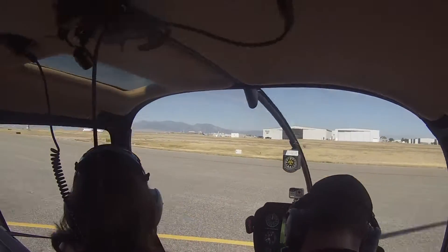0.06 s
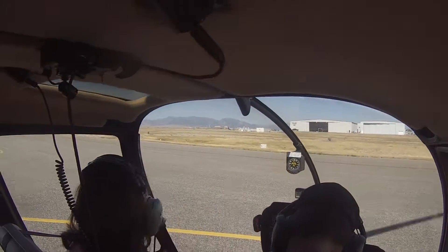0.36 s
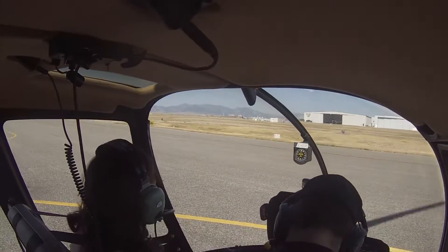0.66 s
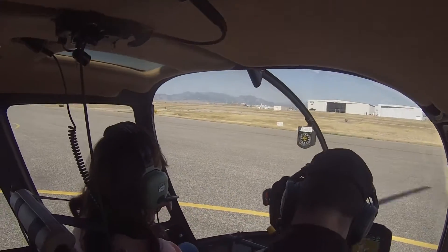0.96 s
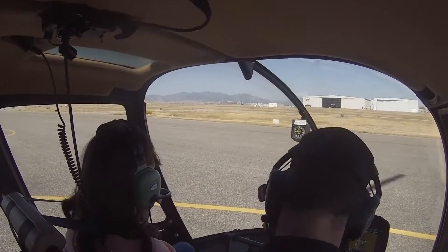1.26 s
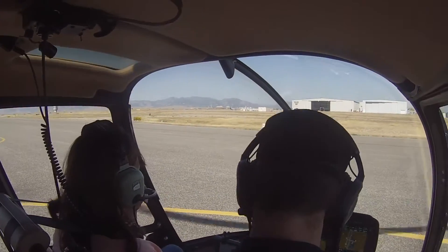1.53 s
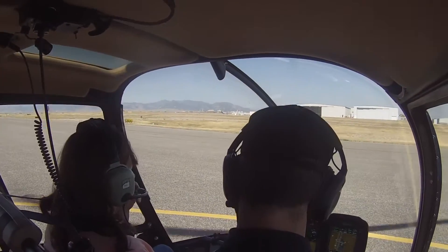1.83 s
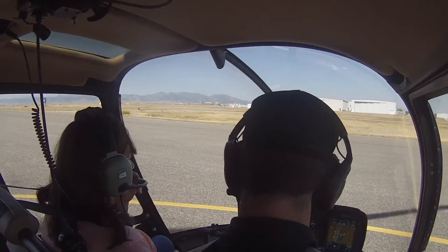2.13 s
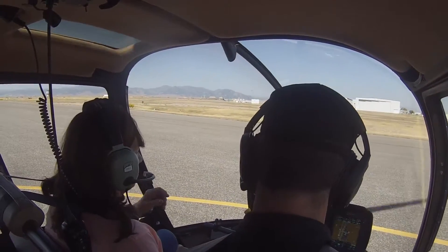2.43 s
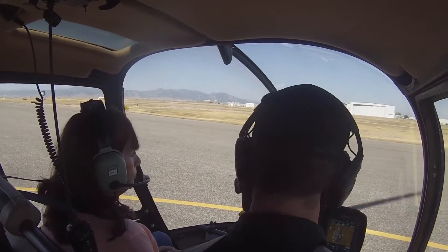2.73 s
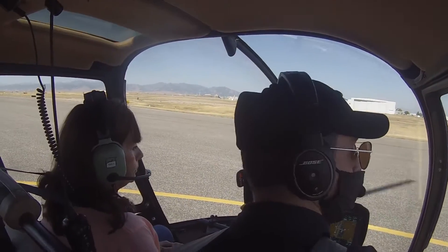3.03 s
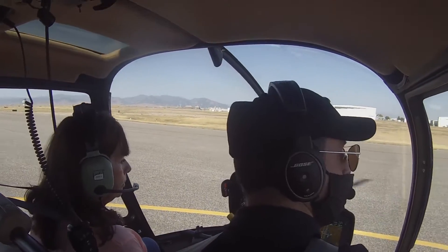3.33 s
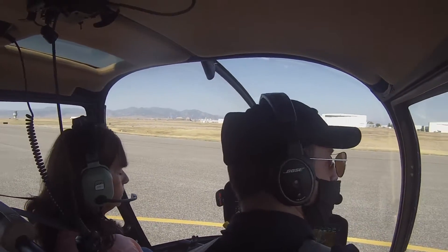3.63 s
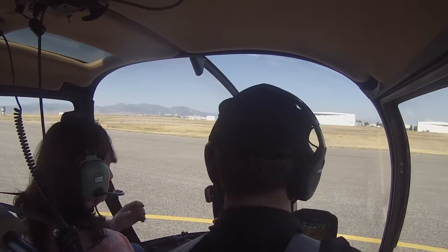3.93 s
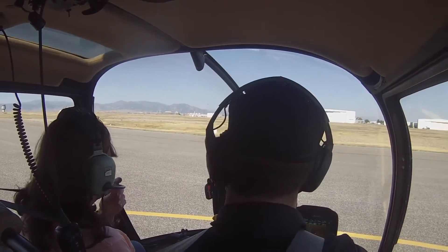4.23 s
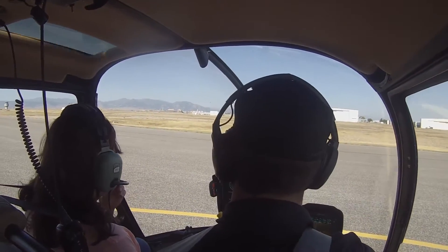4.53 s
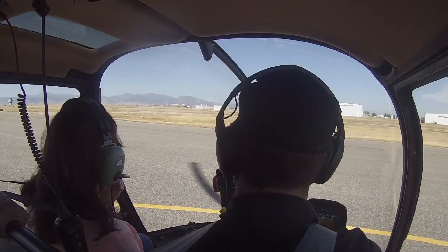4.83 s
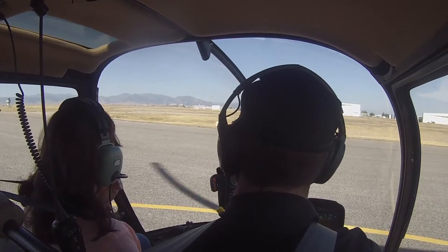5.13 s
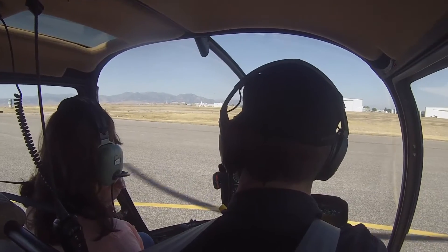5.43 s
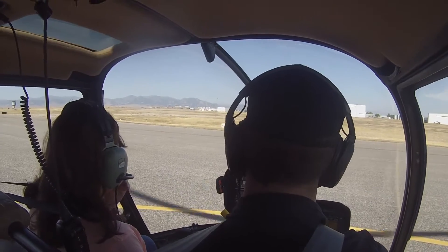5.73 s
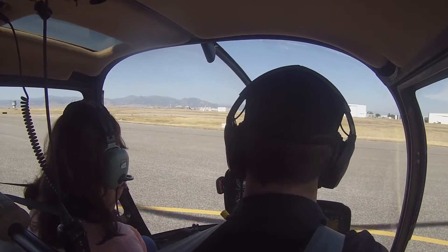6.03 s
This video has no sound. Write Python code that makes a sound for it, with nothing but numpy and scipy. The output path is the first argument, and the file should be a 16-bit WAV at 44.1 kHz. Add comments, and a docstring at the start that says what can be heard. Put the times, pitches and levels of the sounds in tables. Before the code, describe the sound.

Inside a small helicopter running on the ground, a deep, steady engine drone carries a fine mechanical clatter and soft rotor pulsing.

```python
"""Inside a small piston helicopter

On the ground at steady speed, microphone in the cabin, close to the canopy glass.
The six-cylinder engine booms at its firing rate; each firing also shakes the panels and sets the
valve gear clattering. The tail rotor hums, the gearbox whines, and the two main blades pat the
hiss as they pass overhead. Between one and three seconds in, the treble opens and a panel buzzes."""
import sys
import numpy as np
from scipy import signal
from scipy.fft import rfft, irfft, next_fast_len
from scipy.io import wavfile

SR = 44100
rng = np.random.default_rng(int(sys.argv[2]) if len(sys.argv) > 2 else 0)


def waveform_to_disk(signal):
    """Save audio, clipped to [-1, 1], as 16-bit WAV at the path in sys.argv[1]."""
    frames = np.transpose(np.atleast_2d(signal))
    scaled = np.clip(frames, -1, 1) * 32767
    samples = np.round(scaled).astype(np.int16)
    wavfile.write(sys.argv[1], SR, samples)


N = 272097
TIME = np.arange(N) / SR

# accents of the six cylinders in firing order: rasp/dB, clatter/dB, tick/dB
CYLINDERS = [(-4, 1.5, 2), (-2.5, -1, -1), (-3, -1.5, -3.5), (-1.3, 4, 3.5), (-3, -5, -2.5), (-1, 5, -7.5)]
RASP_ACCENTS, CLATTER_ACCENTS, TICK_ACCENTS = np.transpose(CYLINDERS)


def amp(db):
    """Decibels to gain."""
    return 10 ** (np.asarray(db) / 20)


def unit(x):
    """Scales to an rms of one."""
    return x / np.sqrt(np.mean(x ** 2) + 1e-20)


def tone(turns, db):
    """A sine of the given rms level."""
    return np.sqrt(2) * amp(db) * np.sin(2 * np.pi * turns)


def swell(size, peak_s, rise_s, fall_s, hold_s=0):
    """Moves smoothly from zero to size, holds, and returns."""
    early = np.maximum(peak_s - TIME, 0)
    late = np.maximum(TIME - peak_s - hold_s, 0)
    return size * np.exp(-(early / rise_s) ** 2 - (late / fall_s) ** 2)


def shift(size, midway_s, over_s):
    """A smooth step from zero to size."""
    return size * (1 + np.tanh((TIME - midway_s) / over_s)) / 2


def wander(hz):
    """Random drift of unit rms, mostly slower than hz."""
    size = next_fast_len(N)
    f = np.fft.rfftfreq(size, 1 / SR)
    spectrum = rfft(rng.standard_normal(size)) / (1 + (f / hz) ** 2)
    return unit(irfft(spectrum, size)[:N])


def colour(x, points, size=8192):
    """Rings x through a causal filter with the given spectrum, falling off beyond both ends; unit rms."""
    hz, db = np.transpose(points)
    f = abs(np.fft.fftfreq(size, 1 / SR))
    log_gain = np.log(amp(np.interp(np.log(f + 1), np.log(hz), db)))
    log_gain -= 2 * np.log(np.maximum(f / hz[-1], 1)) + np.log(np.clip(hz[0] / (f + 1), 1, 20))
    minimum_phase = np.exp(np.conj(signal.hilbert(log_gain)))
    ring = np.fft.ifft(minimum_phase).real[:size // 2]
    return unit(signal.oaconvolve(x, ring)[:N])


def bursts(firings, accents_db, decay, scatter_db, steady, delay, rise):
    """Noise flares over a steady floor at each firing; rise, decay and delay are shares of a firing."""
    which, age = np.divmod(firings + 1 - delay, 1)
    which = np.maximum(which.astype(int), 0)
    chance = np.clip(rng.standard_normal(N), -2, 1)[which]  # a firing falls short more than it overshoots
    strength = amp(accents_db[which % len(accents_db)] + scatter_db * chance)
    flare = unit(strength * (1 - np.exp(-(age / rise) ** 2)) * np.exp(-age / decay))
    return np.hypot(flare, steady) * rng.standard_normal(N)


def cyclic(x, firings, likeness):
    """Each engine cycle partly repeats the one before, which gathers the noise around the half orders."""
    return x + likeness * np.interp(firings - len(CYLINDERS), firings, x, left=0)


def canopy(x, count=24, echo_db=-11, fade_s=0.012):
    """The glass close to the microphone throws back quick echoes, which ripple the treble."""
    delays_s = rng.uniform(0.001, 0.016, count)
    signs = rng.choice([-1, 1], count)
    taps = np.bincount((delays_s * SR).astype(int), signs * np.exp(-delays_s / fade_s))
    return x + amp(echo_db) * signal.oaconvolve(x, taps / np.linalg.norm(taps))[:N]


def roar():
    """Decibels by which the engine's roar stands above its mean; the brighter noises follow in part."""
    # rise and fall of the roar: t/s, level/dB
    roar_levels = [(0, -30.8), (0.25, -30.1), (0.6, -27.2), (1, -29.0), (1.55, -29.5), (1.85, -28.1),
                   (2.4, -29.6), (2.72, -28.4), (3.2, -29.9), (3.8, -30.9), (4.15, -29.3), (4.95, -29.5),
                   (5.5, -29.9), (5.82, -31.9), (6.17, -29.2)]
    db = np.interp(TIME, *np.transpose(roar_levels))
    return db - db.mean()


def exhaust_boom(firings, flutter=0.028, sway_rad=0.043):
    """The cabin booms at the firing rate; uneven combustion makes the note tremble slightly."""
    boom_db = -9.8 + swell(0.65, peak_s=4.05, rise_s=0.22, fall_s=0.35)  # lifts as the engine picks up
    turns = firings + sway_rad / (2 * np.pi) * wander(13)
    boom = tone(turns, boom_db) * (1 + flutter * wander(23))
    octave = tone(2 * firings + rng.random(), -29 - 2.5 * TIME)
    return boom + octave * (1 + 0.27 * wander(5.5))


def engine_orders(crank, unrest=0.16, trim_db=-0.5):
    """Unequal cylinders add tones at half multiples of the crank rate; the once-a-turn shake grows."""
    # tones of the unequal cylinders: multiple of the crankshaft rate, level before trim/dB
    half_orders = [(1.5, -39.1), (2.0, -35.1), (4.0, -37.6), (4.5, -40.8), (5.0, -44.0), (6.5, -45.0),
                   (7.0, -45.6), (7.5, -42.0), (8.0, -34.9), (9.0, -39.4), (9.5, -46.0), (10.0, -46.3),
                   (10.5, -51.6), (11.0, -44.5), (11.5, -51.5), (12.0, -44.0), (12.5, -53.8), (13.5, -53.9),
                   (14.0, -47.6), (15.0, -46.6), (16.0, -50.2), (17.0, -51.1), (27, -53)]
    out = tone(crank, -37.5 + shift(6.5, midway_s=4.55, over_s=0.25))
    for multiple, db in half_orders:
        turns = multiple * crank + rng.random() + unrest / (2 * np.pi) * wander(1)
        out += tone(turns, db + trim_db) * (1 + unrest * wander(1))
    return out


def panel_rumble(firings):
    """The engine shakes the panels around the microphone; the rumble eases early and slowly returns."""
    # spectrum of the cabin panels: f/Hz, relative level/dB
    panels = [(12, -11), (30, -2.5), (58, -4.5), (100, -1), (130, 7.5), (168, 4), (215, -2), (290, -3),
              (360, 1.5), (450, -8), (600, -17), (1000, -41)]
    db = -23 + swell(-2.5, peak_s=0.7, rise_s=0.14, fall_s=4, hold_s=1.5)
    shaking = cyclic(rng.standard_normal(N), firings, likeness=0.11)
    return colour(shaking, panels) * amp(db)


def exhaust_rasp(firings, blade, gusts_db):
    """Each firing sends a puff of noise through the exhaust pipe."""
    # spectrum of the pipe, heard from the cabin: f/Hz, relative level/dB
    pipe = [(250, -25), (430, -1.5), (590, -1.5), (690, 2.5), (790, 1), (910, -4.5), (1020, -1.5),
            (1150, -8), (1400, -13.5), (1700, -14.5), (1900, -22), (2100, -35)]
    puffs = bursts(firings, RASP_ACCENTS, decay=0.88, scatter_db=3, steady=0.93, delay=0.08, rise=0.1)
    rasp = colour(cyclic(puffs, firings, likeness=0.087), pipe)
    return rasp * amp(-30.5 + roar() + 0.67 * blade + gusts_db)


def casing_clatter(firings, blade, gusts_db):
    """The metal engine casing clatters with every firing."""
    # resonances of the casing: f/Hz, relative level/dB
    casing = [(1400, -15.5), (1700, 4.5), (1900, -1), (2060, -3), (2420, 1.5), (2560, -0.5), (2760, 3),
              (2940, 5.5), (3120, 0.5), (3350, -0.5), (3550, -8.5), (5000, -24)]
    db = -50.5 + swell(5.84, peak_s=1.68, rise_s=1.17, fall_s=0.45, hold_s=1.19) + 0.2 * roar()
    knocks = bursts(firings, CLATTER_ACCENTS, decay=0.59, scatter_db=4.5, steady=0.94,
                    delay=0.17, rise=0.34)
    return colour(canopy(knocks), casing) * amp(db + 0.55 * blade + gusts_db)


def valve_gear(firings, blade, gusts_db):
    """Valves rattle and snap shut between the firings, harder on one bank than on the other."""
    # spectrum of the valve ticks: f/Hz, relative level/dB
    tick_spectrum = [(2500, -23), (3600, -5.5), (4500, -3.5), (4900, -5.5), (5170, 1.5), (5600, 0.5),
                     (6000, -0.5), (6350, -14), (7500, -32)]
    # spectrum of the fizz above them: f/Hz, relative level/dB
    fizz_spectrum = [(5200, -24.5), (6300, -4.5), (7200, 2.5), (8200, 1.5), (8900, -9.5), (10300, -9),
                     (11000, -14), (11800, -20.5), (13000, -23.5), (15000, -30)]
    bank = amp(1.1 * np.cos(np.pi * firings))
    snaps = bursts(firings, TICK_ACCENTS, decay=0.11, scatter_db=2.2, steady=0.5, delay=0.5, rise=0.12)
    rattle = bursts(firings, CLATTER_ACCENTS, decay=0.37, scatter_db=3, steady=0.73,
                    delay=0.04, rise=0.23)
    valves = canopy(bank * (snaps + 1.3 * rattle))
    tick_db = -50 + swell(4.2, peak_s=1.56, rise_s=0.43, fall_s=0.65, hold_s=1) + 0.25 * roar()
    fizz_db = -59.5 + swell(5.3, peak_s=1.1, rise_s=0.82, fall_s=1, hold_s=0.55) + 0.62 * roar()
    ticks = colour(valves, tick_spectrum) * amp(tick_db + 0.69 * blade + gusts_db)
    fizz = colour(valves, fizz_spectrum) * amp(fizz_db + 1.3 * blade + gusts_db)
    return ticks + fizz


def panel_buzz(firings, ring_hz=1660, q=4.882):
    """One loose panel rings with every firing, faintly at first."""
    knocks = bursts(firings, CLATTER_ACCENTS, decay=0.21, scatter_db=3, steady=0.6, delay=0.072, rise=0.1)
    resonance = signal.iirpeak(ring_hz, q, fs=SR)
    ringing = signal.lfilter(*resonance, signal.lfilter(*resonance, knocks))
    db = -55.5 + shift(7.9, midway_s=1.4, over_s=0.27) + roar()
    db += swell(3.3, peak_s=1.85, rise_s=0.38, fall_s=0.4, hold_s=1.2)
    return amp(db) * unit(ringing)


def cooling_fan():
    """Air blown over the cylinders makes a smooth hiss that swells once."""
    # spectrum of the cooling air: f/Hz, relative level/dB
    airflow = [(2000, -12), (3000, -7), (3520, -11.5), (3900, 2), (4350, -7), (4680, -3), (4900, -3.5),
               (5600, -15.5), (7000, -26.5)]
    db = -55.5 + swell(5.3, peak_s=3.5, rise_s=1.1, fall_s=1.2)
    return amp(db) * colour(rng.standard_normal(N), airflow)


def gearbox(crank, teeth_per_turn=8.522, backlash=0.057, flicker=0.15):
    """Odd harmonics of the tooth mesh, blurred by play in the drive, each swelling and fading."""
    mesh = teeth_per_turn * crank + backlash * wander(3.9)
    first_db = -49 + swell(12.9, peak_s=0.8, rise_s=0.55, fall_s=5.8)
    third_db = -43 - 1.4 * TIME + 2.5 * np.cos(2 * np.pi * (TIME - 0.98) / 3.3)
    fifth_db = -60.5 + swell(6, peak_s=4.3, rise_s=3.2, fall_s=2.3)
    return sum(tone(k * mesh, db) * (1 + flicker * wander(10))
               for k, db in [(1, first_db), (3, third_db), (5, fifth_db)])


def tail_rotor(crank, passes_per_turn=1.781, harmonics_db=(-31.5, -42, -43), gust=0.041):
    """Blade-pass hum from behind the cabin, unsteady in the downwash."""
    passes = passes_per_turn * crank
    hum = sum(tone(k * passes + rng.random(), db) for k, db in enumerate(harmonics_db, 1))
    return hum * (1 + gust * wander(3))


def main_rotor(passes, harmonic_db=-51):
    """Each passing blade presses a soft thump on the roof above the microphone."""
    return sum(tone(k * passes, harmonic_db) for k in range(2, 9))


def scene(firing_hz=135.78, main_passes_per_turn=0.2967):
    """One drive train turns everything, running a shade faster for a moment; mono, in the cabin."""
    firings = np.cumsum(firing_hz + swell(0.6, peak_s=4.6, rise_s=0.75, fall_s=0.75)) / SR
    crank = firings / (len(CYLINDERS) / 2)  # four-stroke: each cylinder fires every second turn
    passes = main_passes_per_turn * crank
    engine = exhaust_boom(firings) + engine_orders(crank)
    blade = np.cos(2 * np.pi * passes) + 0.7 * np.cos(np.pi * passes)  # one blade pats harder
    gusts_db = 1.3 * np.tanh(wander(5.3))  # the downwash sways the brighter noises together
    engine += panel_rumble(firings)
    engine += exhaust_rasp(firings, blade, gusts_db)
    engine += casing_clatter(firings, blade, gusts_db)
    engine += valve_gear(firings, blade, gusts_db)
    engine += panel_buzz(firings) + cooling_fan()
    return (engine + gearbox(crank) + tail_rotor(crank) + main_rotor(passes))[None]


def record(dry, edge_hz=15100):
    """The microphone's band ends steeply in the high treble."""
    low_pass = signal.firwin(511, edge_hz, window=("kaiser", 9), fs=SR)
    return signal.oaconvolve(dry, low_pass[None], "same")


dry = scene()
out = record(dry)
waveform_to_disk(out)
```